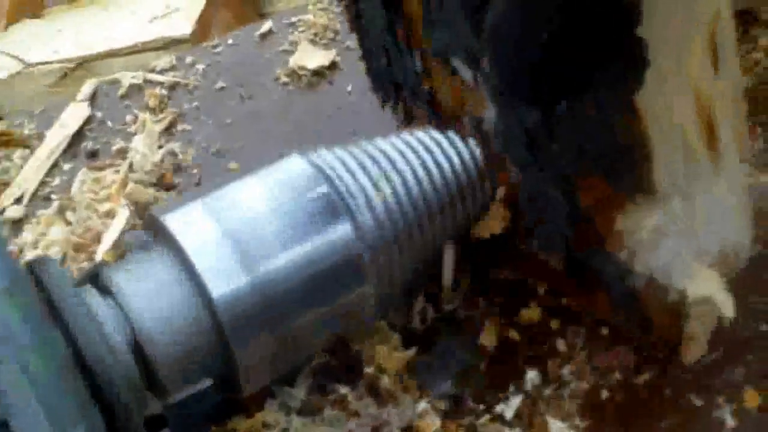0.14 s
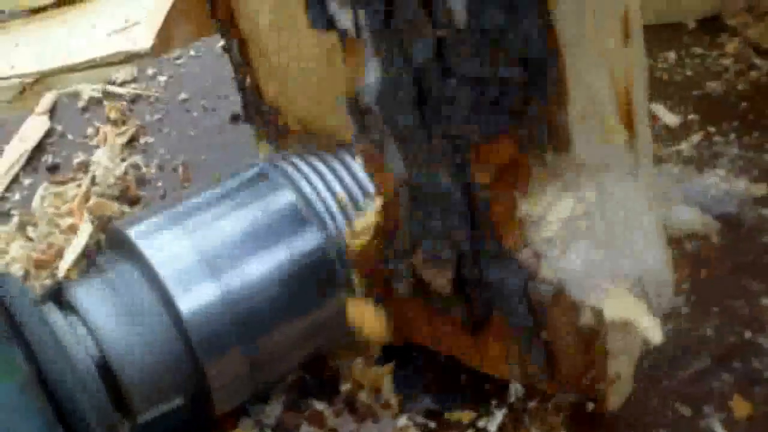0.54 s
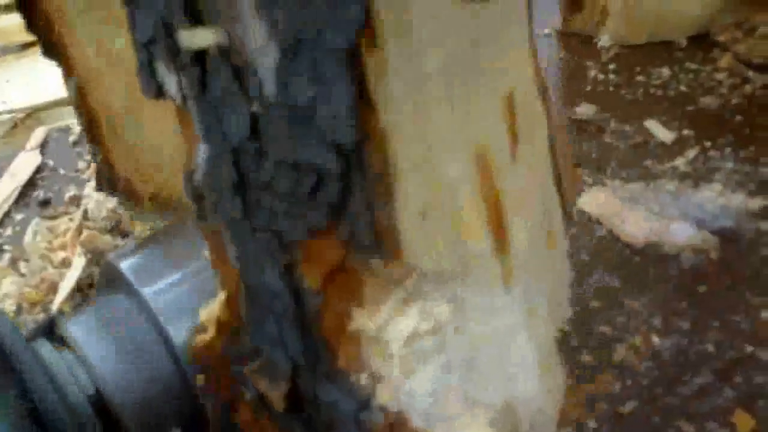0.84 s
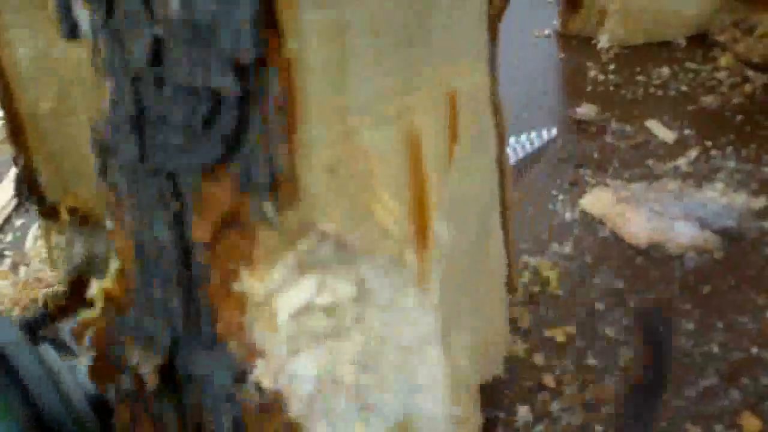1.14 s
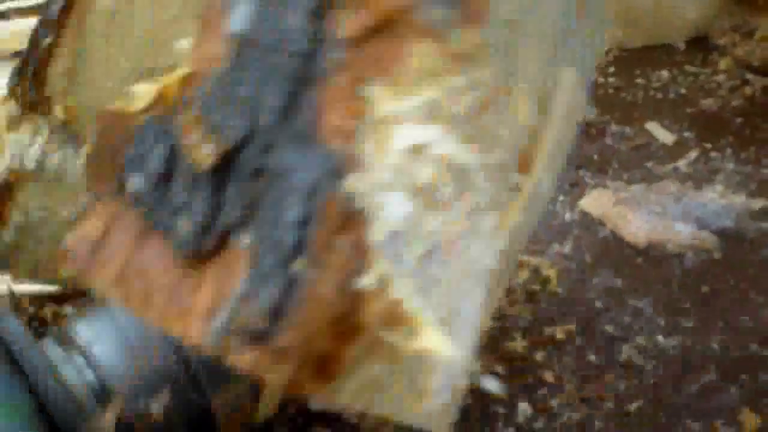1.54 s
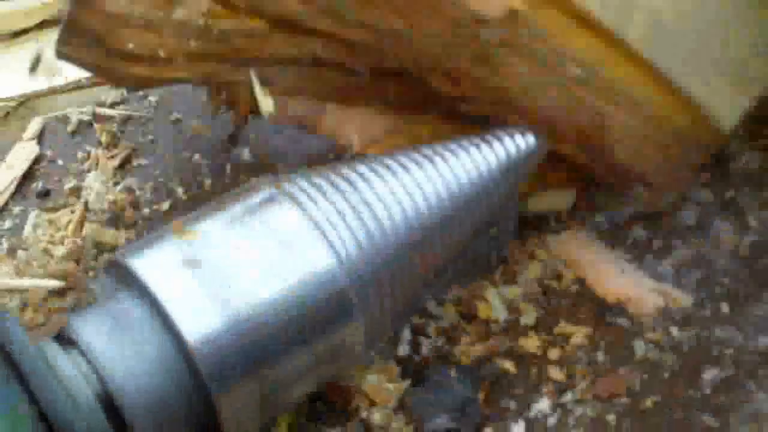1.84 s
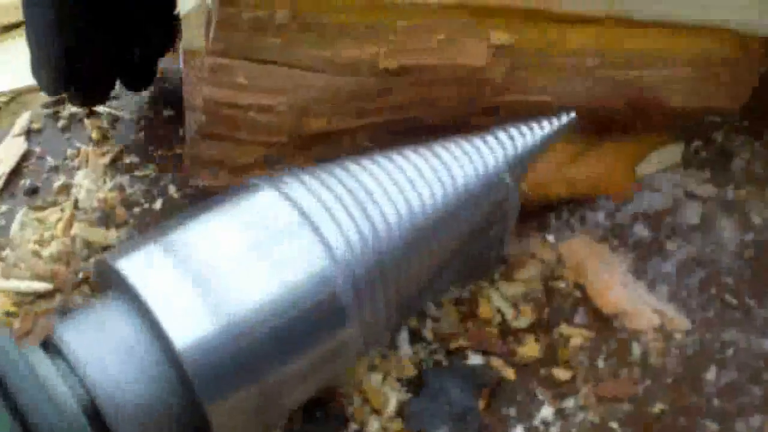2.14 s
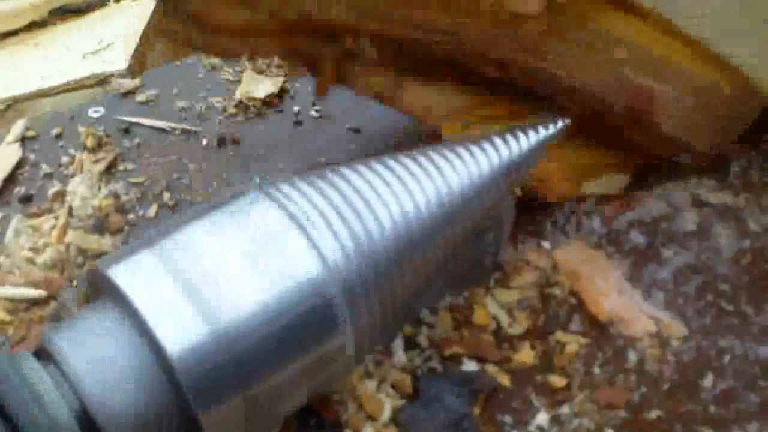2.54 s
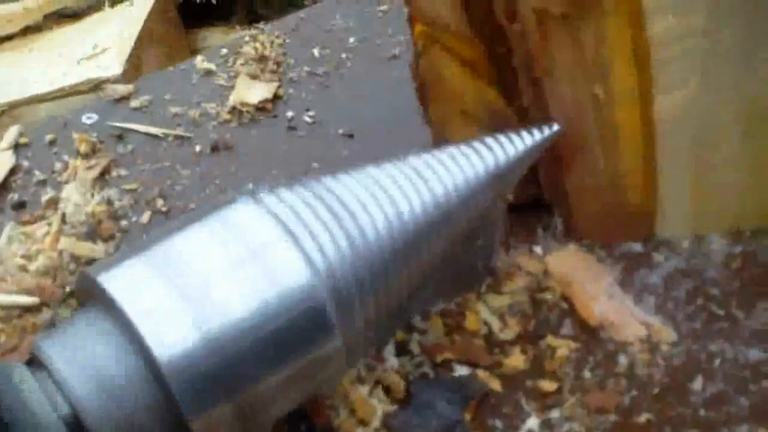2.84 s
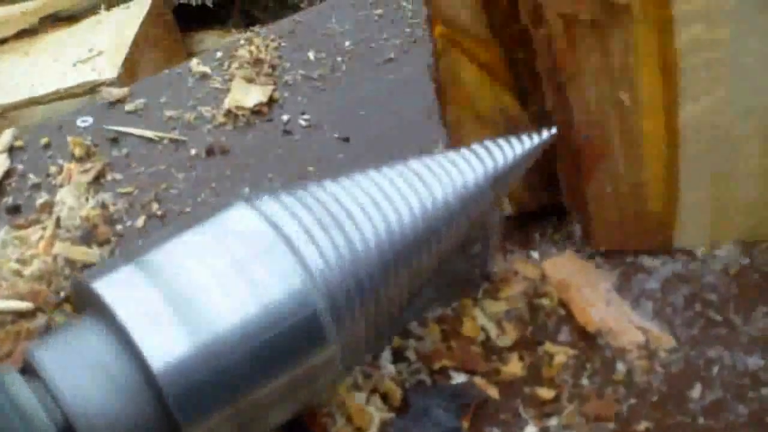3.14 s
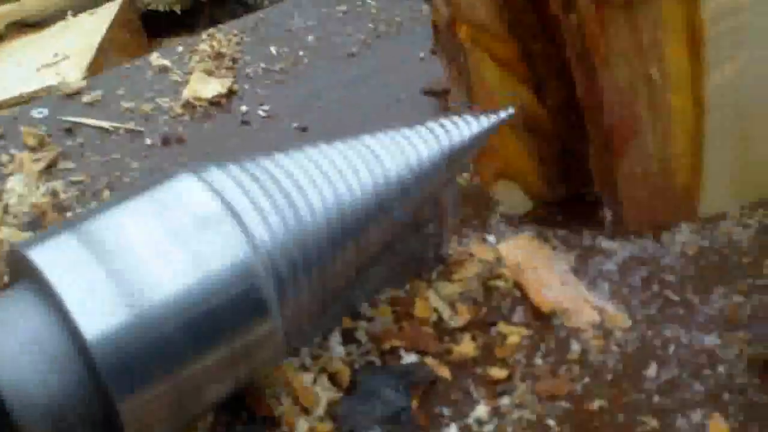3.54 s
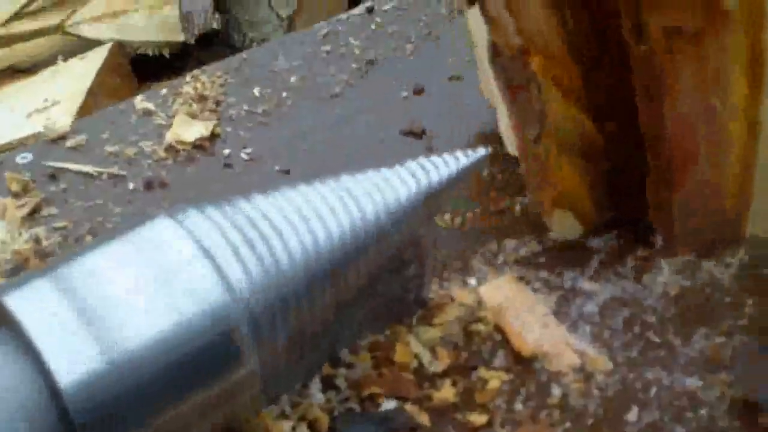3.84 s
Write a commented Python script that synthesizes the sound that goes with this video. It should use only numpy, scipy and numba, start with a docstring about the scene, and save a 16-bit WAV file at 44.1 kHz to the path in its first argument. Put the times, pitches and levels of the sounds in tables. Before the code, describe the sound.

Wood splitting on a motor-driven screw cone, close and dry. A low rub and hum lead into loud, dense cracks and tearing at 0.2-0.5 s, with faint falling ticks near 0.6 s and scattered snaps until 1.4 s. Groaning, rasping friction swells from 1.4 s, peaking near 2.1 s with a thud. Sparse knocks follow, gritty scuffs at 3.2-3.5 s, then a knock cluster from 3.7 s over rising motor whirr.

```python
"""Screw cone splitting a log

A motor-driven screw cone bores into a log on a steel bench, close to the microphone. Noise bursts and
damped rings make the snaps; swarms of clicks through resonances make the tearing and the rasping thread.
Modal thuds sound under some cracks and later, with gritty scuffs, as loose wood knocks about.
Hum and whirr, a sum of shaft harmonics over filtered noise, come up in level towards the end."""
import sys
import numpy as np
from scipy import signal
from scipy.fft import rfft, irfft, next_fast_len
from scipy.io import wavfile
from scipy.ndimage import uniform_filter1d
from numba import njit

SR = 44100
rng = np.random.default_rng(int(sys.argv[2]) if len(sys.argv) > 2 else 0)


def inscribe(sig):
    """Save sig as 16-bit PCM at rate SR to the path in sys.argv[1].

    A 1-D sig is mono; a 2-D sig holds one channel per row.
    Samples are clipped to [-1, 1] before scaling.
    """
    pcm = np.round(np.clip(np.atleast_2d(sig).T, -1, 1) * 32767)
    wavfile.write(sys.argv[1], SR, pcm.astype(np.int16))


N = 176400
T = np.arange(N) / SR  # s
SHAFT_HZ = 24.98  # mean turning rate of the screw
SLIP_SPREAD_DB = 2  # spread of click sizes in rubbing and scuffing


def amp(db):
    """Level to amplitude ratio: 20 dB is a factor of ten."""
    return 10 ** (np.asarray(db) / 20)


def unit(x):
    """Normalisation by mean power: scale to rms 1."""
    return x / np.sqrt(np.mean(x ** 2) + 1e-18)


def curve(table, axis=1):
    """Linear interpolation in time of one column of a table."""
    rows = np.array(table, float)
    return np.interp(T, rows[:, 0], rows[:, axis])


def colour(x, points):
    """Minimum-phase filtering: a causal response through (f/Hz, level/dB) points, by the cepstrum."""
    p = np.array(points, float)
    size = next_fast_len(len(x) + 4096)
    size += size % 2
    log_hz = np.log(np.fft.rfftfreq(size, 1 / SR) + 1)
    db = np.interp(log_hz, np.log(p[:, 0]), p[:, 1])
    cepstrum = irfft(np.log(amp(db)))
    # folding the cepstrum onto positive times makes the response causal
    cepstrum[1:size // 2] *= 2
    cepstrum[size // 2 + 1:] = 0
    response = np.exp(rfft(cepstrum))
    return irfft(rfft(x, size) * response)[:len(x)]


@njit
def band(x, hz, width):
    """State-variable resonator: a second-order band-pass whose centre may move."""
    y, b, l = np.empty(len(x)), 0., 0.  # output, band-pass state, low-pass state
    for i in range(len(x)):
        g, k = np.tan(np.pi * hz[i] / SR), width / hz[i]
        v = (b + g * (x[i] + 1e-18 - l)) / (1 + g * (g + k))
        b, l, y[i] = 2 * v - b, l + 2 * g * v, k * v
    return y


def resonate(x, hz, width):
    """Cascaded resonance: two equal band-passes steepen the skirts; the result has rms 1."""
    hz = hz * np.ones(N)
    once = band(x, hz, float(width))
    return unit(band(once, hz, float(width)))


def walk(rate):
    """Low-passed randomness: held random steps, smoothed to a drift of rms 1."""
    k = max(int(SR / rate), 1)
    steps = rng.standard_normal(N)[np.arange(N) // k]
    return unit(uniform_filter1d(steps, k))


def clicks(rate, spread_db):
    """Poisson-like impulses: random times and signs, most small and a few large."""
    chance, size = rng.random(N), rng.exponential(size=N)
    sign = np.sign(rng.standard_normal(N))
    return (chance < rate / SR) * sign * amp(spread_db * np.minimum(size, 5))


def loudest(x, size):
    """Short-time power: scale so that the loudest stretch of `size` samples has rms 1."""
    return x / np.sqrt(uniform_filter1d(x ** 2, size, mode="constant").max() + 1e-18)


def add(out, start, x):
    """Superposition: mix a sound in at a time in seconds."""
    i = int(start * SR)
    out[i:i + len(x)] += x[:len(out) - i]


def cracks():
    """Brittle fracture: a ragged noise burst and the damped ring of the freed splinter; long ones build slowly."""
    # snaps of wood fibre: t/s, level/dB, burst decay/ms, splinter ring f/Hz
    snaps = [(0.189, -17, 1.3, 3300), (0.2268, -3, 1.3, 3280), (0.2569, -10.5, 1.1, 5400),
             (0.2833, -12, 4, 5100), (.2880, -7, 1.6, 3970), (0.3096, -15, 10.4, 2880),
             (0.327, -15, 6.7, 8900), (0.35, -16.5, 8.3, 4970), (0.3664, -9.5, 1.1, 5240),
             (0.371, -8.5, 1.7, 5030), (0.394, -15.5, 2.5, 6500), (0.4082, -14.5, 1.3, 7100),
             (0.4146, -19, 1.1, 3360), (0.4451, -20, 4.9, 2430), (0.45, -11, 2.2, 8900),
             (0.461, -9, 1.4, 8260), (0.4927, -25, 2.1, 2260), (0.5193, -20, 1.4, 3960),
             (0.5359, -22, 1.2, 1905), (.6220, -32.5, 4.4, 1830), (0.6891, -17.5, 1.9, 8040),
             (0.7104, -20, 2.3, 3110), (.7720, -24, 4, 5140), (0.7956, -18, 1.3, 7200),
             (0.874, -8, 3.2, 6800), (0.926, -23.5, 1.5, 2440), (0.9838, -15, 2.2, 4100),
             (1.005, -23, 4.6, 2640), (1.0790, -21.5, 3.6, 7750), (1.0869, -13, 1.2, 7030),
             (1.1675, -18.5, 0.81, 2030), (1.2189, -24, 1.8, 3800), (1.2305, -24.5, 2, 7400),
             (1.308, -19.5, 2.3, 3740), (1.3634, -21.5, 1.7, 4750), (1.4253, -32, 1.4, 1900),
             (1.4440, -27, 1.1, 1830), (1.6150, -22.5, 1.7, 1860), (2.0680, -26, 1.8, 1720),
             (2.1730, -16, 2.5, 4300), (2.1806, -20, 0.97, 3850), (2.3021, -23, 1.9, 6640),
             (2.383, -26.5, 1.3, 2930), (3.2342, -27, 7.7, 8500)]
    # spectrum of the burst: f/Hz, level/dB
    burst_colour = [(150, -20), (500, -9), (1000, 4.5), (4000, 6.5), (9000, 9), (15000, 2.5)]
    rise_share, ragged_db = 0.27, 3  # rise time as a share of the decay; roughness of the burst
    tail_db, tail_s = -29, 0.01
    ring_cycles = 3.5  # cycles for the ring to decay by a factor e
    ring_gain, ring_ref_hz, ring_floor = 1.52, 1960, 0.44  # low splinters ring the most
    out, t = np.zeros(N), T[:4096]
    for start, db, decay_ms, hz in snaps:
        decay_s = decay_ms / 1000
        rise = 1 - np.exp(-t / (rise_share * decay_s))
        fall = np.exp(-t / decay_s) + amp(tail_db) * np.exp(-t / tail_s)
        roughness = unit(uniform_filter1d(rng.standard_normal(len(t)), size=40))
        ragged = amp(ragged_db * roughness)
        burst = colour(rng.standard_normal(len(t)) * ragged * rise * fall, burst_colour)
        ring = np.sin(2 * np.pi * hz * t) * rise * np.exp(-t * hz / ring_cycles)
        ring_share = ring_floor + ring_gain * (ring_ref_hz / hz) ** 3
        snap = loudest(burst, size=66) + ring_share * loudest(ring, size=66)
        add(out, start, amp(db) * snap)
    return out


def tearing():
    """Shot noise: a dense swarm of tiny decaying grains, with clicks that ping splinter resonances."""
    # small fibres tearing: t/s, level/dB
    tear_level = [(0, -45), (.1, -35), (.2, -29), (.27, -18), (.33, -24), (.4, -27.5), (.435, -36.5),
                  (.66, -36.5), (.74, -42), (.86, -36.5), (.96, -47), (1.05, -38.5), (2.1, -37),
                  (2.22, -42.5), (2.3, -86)]
    # spectrum of the tearing: f/Hz, level/dB
    tear_colour = [(300, -47), (1000, -8), (2000, -8.5), (4500, -4), (8500, 2), (11000, 1), (15000, -6)]
    tears_per_s, spread_db, grain_s = 650, 3.6, .0004
    splinters_per_s, splinter_q, splinter_db = 99, 5, -3.5  # rate and Q for each resonance
    grain = np.exp(-T[:256] / grain_s)
    tears = np.abs(clicks(tears_per_s, spread_db))
    swarm = signal.fftconvolve(tears, grain)[:N] * rng.standard_normal(N)
    pings = np.zeros(N)
    for hz in 1000 * 2 ** (np.arange(10) / 3):  # splinter pitches a third of an octave apart
        ping = resonate(clicks(splinters_per_s, spread_db), hz, hz / splinter_q)
        pings += ping * np.sqrt(hz) * amp(2 * walk(16.1))
    flurries = unit(swarm * amp(2 * walk(90)))
    fibres = flurries + amp(splinter_db) * unit(pings)
    return unit(colour(fibres, tear_colour)) * amp(curve(tear_level))


def peeling():
    """Free vibration of a lengthening fibre: damped ticks of tone and noise that fall in pitch."""
    # ticks of a fibre peeling off: t/s, relative level/dB
    ticks = [(0.57, -22), (0.578, -25), (0.602, -29), (.6075, -21.5), (0.619, -26), (0.6278, -25),
             (0.6418, -23.5), (.6515, -25), (0.658, -27)]
    first_hz, sag_hz_per_s, decay_s = 4880, 17300, 0.00083  # the fibre grows longer, so its pitch falls
    out, t = np.zeros(N), T[:1024]
    for start, db in ticks:
        hz = first_hz - sag_hz_per_s * (start - ticks[0][0])
        tone = np.sin(2 * np.pi * hz * t)
        tick = (tone + .5 * rng.standard_normal(len(t))) * np.exp(-t / decay_s)
        add(out, start, 2 * amp(db) * tick)
    return out


def rubbing():
    """Stick-slip friction: random slips of the thread excite a groaning log, a rasping splinter and hissing fibres."""
    # thread rubbing in the split: t/s, groan level/dB, rasp level/dB, hiss level/dB
    rub_levels = [(0, -29.5, -64, -51), (.2, -25, -59, -30.5), (.28, -34, -54, -31), (.38, -45.5, -52, -40),
                  (.97, -50, -54, -44), (1.1, -37, -46, -43.5), (1.35, -38, -42, -40),
                  (1.42, -34, -30.5, -33), (1.50, -32.5, -47.5, -32.5), (1.64, -29.5, -26.5, -31),
                  (1.70, -22.5, -38, -26.5), (1.88, -18, -28.5, -30.5), (2.02, -22, -39, -20.5),
                  (2.042, -19.5, -25.5, -25), (2.125, -15.5, -17.5, -19.5), (2.16, -30.5, -40, -37.5),
                  (2.33, -54, -93, -78)]
    # resonances of the rubbed log: f/Hz, width of each of two passes/Hz, relative level/dB
    log_modes = [(278, 91, 0.5), (469, 127, 3), (596, 120, 2), (740, 230, 0), (872, 84, -0.5)]
    # ring of the splinter on the thread: t/s, f/Hz
    rasp_pitch = [(1.4, 1840), (1.68, 1950), (1.83, 1670), (2.12, 1660)]
    # spectrum of the hiss: f/Hz, level/dB
    hiss_colour = [(60, -24), (130, 1.5), (1200, 2), (3200, -0.5), (4500, -5), (8500, -8.5), (15000, -11.5)]
    slips_per_s, judder_per_s, judder_db = 1400, 110, 1.5
    bite_s, bite_db = 1.783, 1.5  # the thread bites hardest once a turn
    rasp_width_hz, rasp_wander, rasp_flicker_db = 366, 0.04, 4  # wander is a fraction of the pitch
    upper_ratio, upper_db = 1.83, -17  # second resonance of the splinter
    streak_db, streak_q, streak_patchy_db = -0.5, 6.1, 2  # fibres dragged over the thread sing briefly

    judder = amp(judder_db * walk(judder_per_s))
    bite = amp(bite_db * np.cos(2 * np.pi * SHAFT_HZ * (T - bite_s)))
    slips = clicks(slips_per_s, SLIP_SPREAD_DB) * judder

    groan = np.zeros(N)
    for hz, width, db in log_modes:
        mode_slips = clicks(slips_per_s, SLIP_SPREAD_DB) * judder
        groan += amp(db) * resonate(mode_slips, hz, width)
    groan = unit(bite * groan)

    rasp_hz = curve(rasp_pitch) * np.exp(rasp_wander * walk(60))
    chatter = slips * amp(rasp_flicker_db * np.tanh(walk(judder_per_s)))
    rasp = resonate(chatter, rasp_hz, rasp_width_hz)
    rasp += amp(upper_db) * resonate(chatter, rasp_hz * upper_ratio, 2 * rasp_width_hz)

    streaks = np.zeros(N)
    for hz in np.geomspace(2000, 9000, num=8):
        wandering_hz = hz * np.exp(rasp_wander * walk(SHAFT_HZ))
        streak = resonate(slips, wandering_hz, hz / streak_q)
        streaks += streak * np.sqrt(hz) * amp(streak_patchy_db * walk(SHAFT_HZ))
    friction = unit(slips) + judder * rng.standard_normal(N) + amp(streak_db) * unit(streaks)
    hiss = unit(colour(friction, hiss_colour))

    out = groan * amp(curve(rub_levels, axis=1))
    out += rasp * amp(curve(rub_levels, axis=2))
    return out + hiss * amp(curve(rub_levels, axis=3))


def knocks():
    """Modal impact: a rattling contact rings log and bench; each thud is centred on its own pitch."""
    # low woody thuds, the log's body under early cracks and later knocks on the bench:
    # t/s, level/dB, thud f/Hz, rattle decay/s
    thuds = [(0.199, -22.5, 113, 0.02), (.229, -19, 1100, 0.0093), (0.288, -21.5, 700, 0.0025),
             (0.312, -26, 1120, 0.0092), (.352, -27, 1130, 0.0037), (0.8752, -23, 220, 0.00089),
             (2.129, -14.5, 175, 0.009), (2.259, -18, 505, 0.016), (2.38, -22, 334, 0.018),
             (2.463, -30, 317, 0.011), (2.729, -29.5, 277, 0.015), (3.114, -25.5, 149, 0.03),
             (3.178, -25, 188, 0.031), (3.231, -20.5, 286, 0.016), (3.268, -31, 280, 0.0032),
             (3.742, -22, 400, 0.012), (3.787, -23, 320, 0.022), (3.845, -24, 280, 0.025),
             (3.9, -18.5, 320, 0.028), (3.962, -22, 193, 0.007)]
    # modes of log and bench before the scatter of each blow: f/Hz, t60/s, level/dB
    body_modes = [(131.7, 0.075, 8), (188, 0.054, 5.5), (258, 0.063, 4), (295.5, 0.31, -4.5),
                  (437, 0.064, 0), (570, 0.045, -3.5), (1026, 0.031, 2.5)]
    grit_colour = [(150, 4.5), (4000, 1.5), (15000, -10)]  # f/Hz, level/dB
    grit_db, thud_q = -1, .8
    ring_up_s = .004
    low_cut_hz = 52  # the bench radiates little below this
    low_cut = signal.butter(4, low_cut_hz, "high", fs=SR, output="sos")
    out, t = np.zeros(N), T[:12000]
    for start, db, hz, rattle_s in thuds:
        rattle = rng.standard_normal(len(t)) * np.exp(-t / rattle_s) * (1 - np.exp(-t / 0.0018))
        body = np.zeros(len(t))
        for mode_hz, t60, gain_db in body_modes:
            level_chance, pitch_chance = rng.standard_normal(2)
            vibration = np.cos(2 * np.pi * mode_hz * (1 + 0.068 * pitch_chance) * t)
            body += amp(gain_db + 2 * level_chance) * vibration * np.exp(-np.log(1000) * t / t60)
        ringing = 1 - np.exp(-rattle_s / ring_up_s)  # a very brief contact hardly sets the modes ringing
        blow = ringing * unit(signal.fftconvolve(rattle, body)[:len(t)])
        blow += amp(grit_db) * unit(colour(rattle, grit_colour))
        thud = band(blow, np.full(len(t), float(hz)), hz / thud_q)
        thud = signal.sosfilt(low_cut, thud)
        add(out, start, amp(db) * loudest(thud, size=660))
    return out


def scuffs():
    """Sliding friction: the log drags briefly over gritty chips, heard as clicks and noise under a short swell."""
    # scuffs over the bench: t/s, level/dB, time scale/s (the swell peaks after half of it)
    drags = [(3.235, -42, 0.023), (3.268, -24, 0.0089), (3.468, -27, 0.02), (3.505, -21, 0.016)]
    # spectrum of the scuffs: f/Hz, level/dB
    scuff_colour = [(100, 5.5), (500, 11), (1100, 4.5), (2200, 8), (3500, 0), (8000, -8.5), (15000, -27)]
    chips_per_s = 400
    push = np.zeros(N)
    for start, db, scale_s in drags:
        age = np.maximum(T - start, 0) / scale_s
        push += amp(db) * 2 * age * np.exp(1 - 2 * age)
    grit = unit(clicks(chips_per_s, SLIP_SPREAD_DB)) + 0.62 * rng.standard_normal(N)
    return push * unit(colour(grit, scuff_colour))


def machine():
    """Rotational harmonics: wavering lines on multiples of the shaft rate over the whirr of fan and bearings."""
    # hum of the motor: multiple of the shaft rate, relative level/dB
    orders = [(12, -13), (24, -12.5), (28, -9), (32, -3.5), (35, -7), (36, -8), (52, -10.5), (140, -12)]
    # common level of hum and whirr as heard: t/s, level/dB
    machine_level = [(0, -29), (.2, -24.5), (.3, -31), (.45, -47), (.75, -38), (1.3, -45), (1.9, -29.5),
                     (2.2, -42.5), (2.5, -41), (2.8, -36.5), (3.3, -29.5), (3.7, -24.5), (4, -21.5)]
    # spectrum of the whirr: f/Hz, level/dB
    whirr_colour = [(50, -6.5), (105, 8), (450, -1.5), (650, -2.5), (850, 4), (1020, -2), (1280, -0.5),
                    (1500, -8), (1900, -4.5), (3300, -6.5), (4000, -13), (8500, -14.5), (15000, -21)]
    hum_db, whirr_db, waver_db = -5.5, -4, 2
    turns = np.cumsum(SHAFT_HZ * (1 + 0.000448 * walk(5.12))) / SR  # the speed drifts slightly
    hum = np.zeros(N)
    for order, db in orders:
        line = np.sqrt(2) * np.sin(2 * np.pi * (round(order) * turns + rng.random()))
        hum += amp(db + waver_db * walk(9)) * line
    whirr = unit(colour(rng.standard_normal(N), whirr_colour))
    whirr *= 1 + 0.082 * np.sin(2 * np.pi * turns)  # pulses once a turn
    return (amp(hum_db) * hum + amp(whirr_db) * whirr) * amp(curve(machine_level))


def scene():
    """Superposition of the splitting wood and the machine, heard close and dry."""
    wood = cracks() + tearing() + peeling() + rubbing() + knocks() + scuffs()
    return (wood + machine())[None]


def record(dry):
    """Overload and band limits: peaks clip, the microphone has a notch in the high treble, the top is cut."""
    notch_hz, notch_width_hz, notch_depth = 11240, 3660, 0.93  # depth 1 would cancel the centre
    top_hz = 15250
    x = np.clip(dry, -1, 1)
    b, a = signal.iirpeak(notch_hz, notch_hz / notch_width_hz, fs=SR)
    x = x - notch_depth * signal.lfilter(b, a, x)
    top_cut = signal.ellip(8, .2, 70, top_hz, fs=SR, output="sos")
    return signal.sosfilt(top_cut, x)


dry = scene()
out = record(dry)
inscribe(out)
```